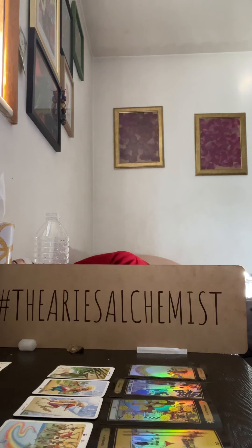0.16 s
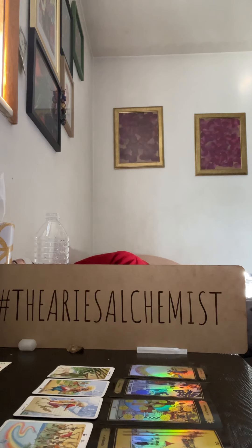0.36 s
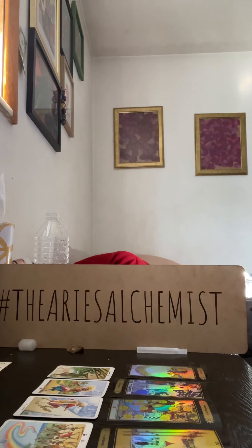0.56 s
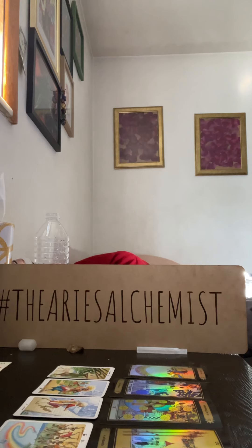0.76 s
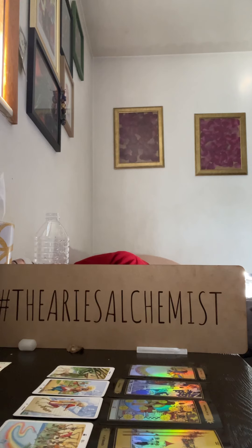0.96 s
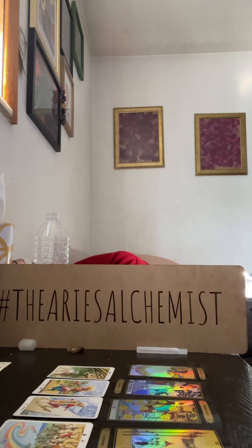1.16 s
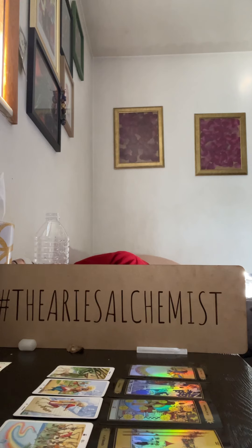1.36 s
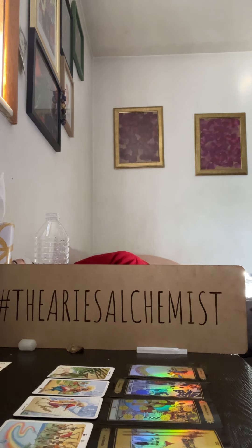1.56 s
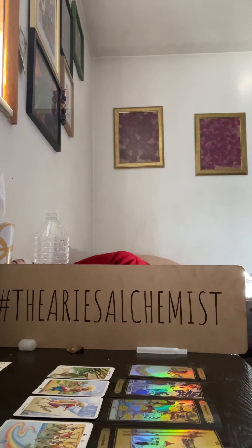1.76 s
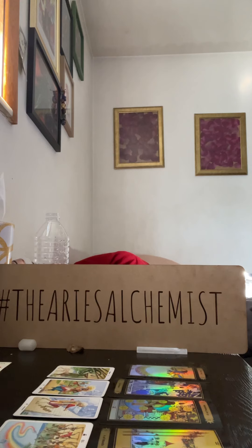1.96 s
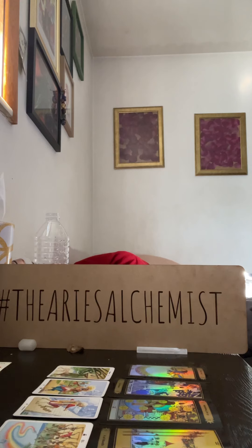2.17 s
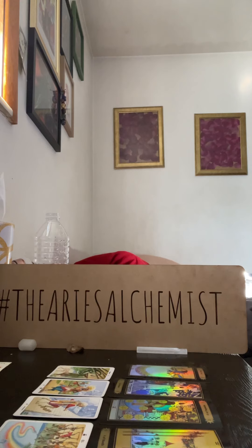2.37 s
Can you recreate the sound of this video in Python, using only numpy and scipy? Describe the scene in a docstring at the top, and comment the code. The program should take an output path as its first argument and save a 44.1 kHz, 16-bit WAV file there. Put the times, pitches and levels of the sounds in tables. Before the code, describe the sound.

Cards are shuffled at a table in a quick, uneven flurry of slaps, edge flicks and dull hand thuds. After a brief lull they slide together with a few light clicks, heard up close in a small, hushed room.

```python
"""A deck of cards shuffled by hand at a table in a small, quiet room, close to a stereo microphone.
Over the room's hush the hands grip the deck, card faces slide and the hands thud softly.
Packets then slap onto the deck in a quick flurry, stiff edges flick and ring, and the table rings along.
Last, the deck is squared with a longer slide and a few faint clicks."""
import sys
import numpy as np
from scipy import signal
from scipy.fft import rfft, irfft
from scipy.io import wavfile
from scipy.ndimage import uniform_filter1d

SR = 44100
rng = np.random.default_rng(int(sys.argv[2]) if len(sys.argv) > 2 else 0)


def dump(signal):
    """Clip the signal to [-1, 1] and save it as 16-bit WAV at the path in sys.argv[1]."""
    limited = np.clip(np.atleast_2d(signal).T, -1, 1)
    pcm = np.round(limited * 32767).astype(np.int16)
    wavfile.write(sys.argv[1], SR, pcm)


N = 105840
T = np.arange(N) / SR
FFT_SIZE = 2 ** 18
HZ = np.maximum(np.arange(FFT_SIZE // 2 + 1) * SR / FFT_SIZE, 1)
SIDES = np.array([[1], [-1]])  # left, right


def from_db(db):
    """Decibels to gain."""
    return 10 ** (np.asarray(db) / 20)


def at_hz(points, hz, column=1):
    """One column of a table, read on a log-frequency axis."""
    rows = np.array(points, float)
    return np.interp(np.log(hz), np.log(rows[:, 0]), rows[:, column])


def unit_rms(x):
    """Scale to rms 1."""
    return x / np.sqrt(np.mean(np.abs(x) ** 2) + 1e-20)


def minimum_phase(gain):
    """Causal response with the given magnitude."""
    cepstrum = irfft(np.log(gain + 1e-9))
    half = len(cepstrum) // 2
    cepstrum[1:half] *= 2
    cepstrum[half + 1:] = 0
    return np.exp(rfft(cepstrum))


def add(out, start_s, sound):
    """Mix a sound in at start_s."""
    i = max(int(start_s * SR), 0)
    out[..., i:i + sound.shape[-1]] += sound[..., :max(N - i, 0)]


def coloured(noise, colour):
    """Give white noise a spectrum at unchanged power."""
    return irfft(rfft(noise, FFT_SIZE) * unit_rms(from_db(at_hz(colour, HZ))))[..., :N]


def dulled(x, top_hz):
    """A gentle low-pass."""
    return signal.sosfilt(signal.butter(2, top_hz, fs=SR, output="sos"), x)


def rise_and_fall(t, rise_s, t60_s):
    """An envelope that builds, then loses 60 dB every t60_s."""
    return (1 - np.exp(-t / rise_s)) * np.exp(-np.log(1000) * t / t60_s)


# Spectrum of the quiet room: frequency_hz, density_db
HUSH_COLOUR = [(15, -35), (30, -8), (55, 4.5), (85, 2.5), (150, -6.5), (400, -18), (1000, -32.5),
               (2500, -37), (5000, -35), (10000, -37), (13000, -56)]

def hush():
    """Room tone: a steady, very faint, low noise."""
    return from_db(-68) * coloured(rng.standard_normal((2, N)), HUSH_COLOUR)


# Rustle of the hands, close up: time_s, level_db
GRIP_LEVELS = [(0, -60.5), (.05, -75), (.125, -84), (.16, -36), (.24, -45), (.31, -66), (.43, -58),
               (.53, -46.5), (.60, -40), (.68, -46.5), (.83, -47), (.96, -47), (1.07, -43), (1.16, -60.5),
               (1.42, -65.5), (1.59, -65), (1.63, -57), (1.71, -51), (1.80, -41), (1.95, -47.5),
               (2.06, -62), (2.3, -88), (2.4, -59)]
# Spectrum of that rustle: frequency_hz, density_db
GRIP_SPECTRUM = [(20, -24), (45, -2), (80, 0.5), (150, -2), (260, -8), (430, -3.5), (800, -8), (1300, -7.5),
                 (2500, -21.5), (8000, -43)]

def grip():
    """Fingers and palms shift on the deck: a dull rustle."""
    level_db = np.interp(T, *np.transpose(GRIP_LEVELS))
    return coloured(rng.standard_normal((2, N)), GRIP_SPECTRUM) * from_db(level_db)


# Hiss of card sliding over card: time_s, level_db
SLIDE_LEVELS = [(0, -71.5), (.125, -94), (.16, -26.5), (.26, -65), (.30, -60), (.37, -54), (.43, -40),
                (.51, -43), (.67, -50.5), (.78, -32), (.84, -51), (.95, -45.5), (1.03, -39), (1.11, -59),
                (1.25, -59.5), (1.42, -54), (1.54, -44), (1.71, -45.5), (1.80, -39), (1.90, -42),
                (1.97, -47.5), (2.03, -63.5), (2.13, -61), (2.21, -56), (2.29, -61.5), (2.4, -50)]
# Spectrum of that hiss: frequency_hz, density_db
SLIDE_SPECTRUM = [(100, -32), (450, -12.5), (800, -2), (1150, -13.5), (1600, -4.5), (2700, 4), (3300, -5),
                  (4100, -1), (5200, -11), (9500, -18), (11200, -14), (12500, -31), (16000, -26)]

def sliding(catches_per_s=700, catch_share=.55, catch_spread_db=4, slip_s=.0071, slip_db=1.5):
    """Card faces rub, catching and slipping: an uneven hiss with tiny ticks."""
    sizes = from_db(catch_spread_db * np.minimum(rng.exponential(1, N), 4))
    catches = unit_rms(rng.standard_normal((2, N)) * sizes * (rng.random(N) < catches_per_s / SR))
    rub = catch_share * catches + np.sqrt(1 - catch_share ** 2) * rng.standard_normal((2, N))
    waver_db = slip_db * unit_rms(uniform_filter1d(rng.standard_normal(N), int(slip_s * SR)))
    level_db = np.interp(T, *np.transpose(SLIDE_LEVELS))
    return coloured(rub, SLIDE_SPECTRUM) * from_db(level_db + waver_db)


# Soft thuds of the hands near the microphone: start_s, pitch_hz, level_db
HAND_THUDS = [(.03, 85, -44.5), (.165, 84, -45), (0.267, 80, -23.5), (0.403, 85.5, -54), (0.607, 69.6, -30),
              (.645, 61.6, -43), (0.736, 58, -24), (0.88, 65, -31), (1.052, 61, -22), (1.196, 79.5, -37.5),
              (1.259, 65, -40.5), (1.316, 67.7, -36), (1.767, 75, -33.5)]

def thuds():
    """The hands take the weight of a packet: a low, damped swing."""
    out, t = np.zeros((2, N)), T[:SR // 2]
    envelope = 2 * rise_and_fall(t, rise_s=.011, t60_s=.069)
    for start_s, pitch_hz, level_db in HAND_THUDS:
        add(out[0], start_s, from_db(level_db) * np.sin(2 * np.pi * pitch_hz * t) * envelope)
    return out


# Packets landing on the deck: start_s, decay_s, body_db, low_mid_db, edge_db, presence_db, treble_db
PACKET_SLAPS = [(0.141, 0.0013, -34, -33, -46, -40, -37), (0.1556, 0.0033, -22, -16, -12, -28, -13.5),
                (0.161, 0.00099, -21, -19.5, -25, -10.5, -26), (0.2061, 0.0024, -19, -30, -12, -18.5, -12),
                (0.2522, 0.0029, -20, -17.5, -19, -15.5, -15),
                (0.2606, 0.0058, -25.5, -20.5, -19.5, -20, -20), (0.339, 0.0047, -27.5, -33, -41, -42, -45),
                (0.381, 0.0018, -28.5, -39, -43, -40, -43), (0.4017, 0.0028, -18, -15, -14, -11, -10),
                (0.438, 0.003, -38, -20, -31.5, -24, -23), (0.471, 0.0028, -19.5, -18, -18.5, -10.5, -14.5),
                (0.532, 0.005, -23, -18, -24.5, -30, -27), (0.5958, 0.0014, -22.5, -20.5, -22, -13.5, -19),
                (0.631, 0.0018, -24.5, -20.5, -14.5, -24, -15), (0.6953, 0.002, -23, -56, -30, -22, -56),
                (0.696, 0.0014, -28.5, -21, -25.5, -16, -16.5),
                (0.7311, 0.0015, -12, -15.5, -6, -15.5, -8.5), (0.811, 0.0049, -25, -25.5, -27, -32, -25.5),
                (0.8548, 0.0035, -23, -29, -23, -34, -25.5), (0.876, 0.0033, -18, -22.5, -12, -17.5, -16),
                (0.886, 0.013, -12.5, -17, -20.5, -24.5, -27), (0.9356, 0.003, -25, -27.5, -31, -32, -25),
                (0.967, 0.0086, -36, -30, -28, -54, -60), (0.982, 0.0054, -23, -48, -49, -22, -34),
                (0.989, 0.0028, -22, -22.5, -25, -66, -46), (1.0001, 0.0036, -33, -19, -18.5, -33, -19.5),
                (1.017, 0.0053, -20.5, -23, -21.5, -27, -26), (1.028, 0.0046, -15.5, -22, -24, -21, -23.5),
                (1.0363, 0.0056, -17.5, -7.5, -9.5, -15.5, -11.5), (1.041, 0.0026, -10, -14, -17, -16, -15),
                (1.051, 0.007, -23.5, -12.5, -20, -23, -31), (1.17, 0.012, -39, -26.5, -33.5, -51.5, -53),
                (1.304, 0.0068, -37.5, -36.5, -41, -46, -37), (1.369, 0.0022, -71, -50, -50, -30, -32),
                (1.379, 0.0026, -61, -40, -39.5, -52, -34), (1.42, 0.0047, -46, -57, -44, -74, -65),
                (1.475, 0.003, -67, -31, -32.5, -41, -34), (1.6104, 0.0068, -31.5, -39, -24, -41, -34.5),
                (1.65, 0.012, -33.5, -27.5, -22.5, -53, -36), (1.7483, 0.0013, -50, -28, -20.5, -32.5, -25),
                (1.7612, 0.0012, -37.5, -22.5, -19, -17.5, -19), (1.7648, 0.0036, -27, -20, -29, -27, -20),
                (1.836, 0.0016, -37, -27.5, -22.5, -32, -50), (1.94, 0.006, -33.5, -24.5, -27, -39, -23),
                (2.0317, 0.0036, -67, -44, -35, -56.5, -49), (2.16, 0.0025, -71, -57, -47, -60, -60)]
# Centres of those five bands, body to treble: frequency_hz
BAND_CENTRES_HZ = [220, 720, 2200, 4300, 8500]
# Spectrum of card striking card: frequency_hz, density_db
DECK_COLOUR = [(40, -14), (70, -12), (160, -4.5), (300, -14.5), (430, -8), (620, -8.5), (820, -5),
               (1150, -16.5), (1600, -8.5), (2300, -4), (2900, -2.5), (3300, -7.5), (4100, -2.5),
               (5200, -13.5), (7500, -21), (10000, -23), (13000, -26), (16000, -38.5)]

def slaps(contacts_per_s=3500, attack_s=.0006, first_contact=.19, brush_s=.004, brush_db=-16.5):
    """Each packet brushes in, lands with one sharp contact, and the cards behind it flutter to rest."""
    size, lead = 4096, 512  # samples in a slap, and of those, before it lands
    out, t = np.zeros((2, N)), T[:size] - lead / SR
    since_landing = np.maximum(t, 0)
    hz = np.maximum(np.arange(size // 2 + 1) * SR / size, 1)
    deck = unit_rms(from_db(at_hz(DECK_COLOUR, hz))) * from_db(-2.42) * np.sqrt(SR / 100)
    for start_s, decay_s, *band_db in PACKET_SLAPS:
        contacts = rng.standard_normal((2, size))
        contacts *= np.where(rng.random((2, size)) < contacts_per_s / SR, 1, .25)
        brush = dulled(contacts, top_hz=3070) * from_db(brush_db) * np.exp(-np.abs(t) / brush_s)
        flutter = contacts * (1 - np.exp(-since_landing / attack_s)) * np.exp(-since_landing / decay_s)
        slap = brush + flutter
        slap /= np.sqrt(np.sum(slap ** 2, axis=1, keepdims=True))
        slap[0, lead + int(attack_s * SR)] += first_contact
        # Gentle slaps, with treble_db under -31, lack the very top.
        top_db = np.interp(hz, [11000, 13000], [0, .24 * min(band_db[-1] + 31, 0)])
        tone_db = np.interp(np.log(hz), np.log(BAND_CENTRES_HZ), band_db)
        response = minimum_phase(deck * from_db(tone_db + top_db))
        add(out, start_s - lead / SR, irfft(rfft(slap) * response))
    return out


# Stiff card edges flicking free: start_s, pitch_hz, level_db, t60_s
EDGE_FLICKS = [(.2048, 2190, 2, 0.025), (.4012, 2210, -0.5, 0.03), (.4712, 2130, -7, 0.037),
               (.6312, 2480, -20, 0.038), (.7322, 2457, -7, 0.043), (0.7394, 2770, -4, 0.028),
               (1.7614, 2698, -11, 0.039)]

def flicks(overtone_ratio=1.85, overtone_db=-24.5, rise_s=.0019):
    """A released card edge rings briefly at one pitch, with a weak overtone."""
    out, t = np.zeros((2, N)), T[:SR // 5]
    for start_s, pitch_hz, level_db, t60_s in EDGE_FLICKS:
        phase = 2 * np.pi * pitch_hz * t
        ring = np.sin(phase) + from_db(overtone_db) * np.sin(overtone_ratio * phase)
        add(out[0], start_s, from_db(level_db) * ring * rise_and_fall(t, rise_s, t60_s))
    return out


# Resonances of the table and what stands near it: pitch_hz, over_direct_db, t60_s
TABLE_RESONANCES = [(424.9, -7, 0.11), (833, -5, 0.096), (899, -7, 0.061), (1180, 0, .1),
                    (1414, -3.5, 0.041), (1557, 3.5, 0.048), (1730, -32, 0.22), (2410, -11, 0.17),
                    (2540, -9, 0.083), (2985, -5.5, 0.036)]

def table(cards):
    """The table rings along with the cards at its resonances."""
    out = cards.copy()
    for pitch_hz, over_direct_db, t60_s in TABLE_RESONANCES:
        radius = from_db(-60 / (t60_s * SR))
        poles = [1, -2 * radius * np.cos(2 * np.pi * pitch_hz / SR), radius ** 2]
        out += from_db(over_direct_db) * (1 - radius ** 2) / 2 * signal.lfilter([1, 0, -1], poles, cards)
    return out


# The microphone's two ports: frequency_hz, likeness (0-1), right_minus_left_db
MIC_PORTS = [(100, 1, 1), (450, 0.92, 3.5), (1042, 0.63, 1), (2360, 0.1, 2), (3730, 1, 0),
             (5130, 0.68, -0.5), (6700, 1, 1), (13000, 0.93, -0.5)]
# How far the right port leads the left: frequency_hz, lead_rad
MIC_PHASE = [(100, 0), (500, .15), (1000, .9), (2400, .6), (3400, 2), (5400, 2), (7000, .5), (10000, 1.5),
             (13000, 2.8), (16000, 3.4)]

def microphone(pair):
    """Row 0 reaches both ports alike, row 1 with opposite signs; together they make left and right."""
    mid, side = rfft(pair, FFT_SIZE)
    likeness = np.clip(at_hz(MIC_PORTS, HZ), 0, .995)
    ports = np.sqrt((1 + likeness) / 2) * mid + SIDES * np.sqrt((1 - likeness) / 2) * side
    phase_shift = np.exp(-.5j * SIDES * at_hz(MIC_PHASE, HZ))
    balance = from_db(-.5 * SIDES * at_hz(MIC_PORTS, HZ, column=2))
    return irfft(ports * phase_shift * balance)[:, :N]


# Echoes off the table and near walls: left_delay_s, right_delay_s, level_db
NEAR_ECHOES = [(.0031, 0.0028, -11), (.0086, 0.0096, -15.5), (.0162, 0.013, -18)]
# The small room's tail: frequency_hz, level_db, t60_s
ROOM_TAIL = [(81.4, -4, 0.32), (300, -8, 0.14), (900, -14, 0.29), (2500, -12, 0.29), (4950, -10.5, 0.19),
             (10000, -12.5, 0.19), (14000, -24, .15)]

def room(direct, build_s=.002):
    """The room adds a few near echoes and a diffuse tail that dies band by band."""
    t = T[:SR // 2]
    tail, echoes = np.zeros((2, 2, len(t)))
    edges_hz = np.geomspace(40, 17000, 13)
    for low, high in zip(edges_hz, edges_hz[1:]):
        hz = np.sqrt(low * high)
        envelope = rise_and_fall(t, build_s, at_hz(ROOM_TAIL, hz, column=2))
        band = signal.butter(2, [low, high], "band", fs=SR, output="sos")
        mid, side = signal.sosfilt(band, rng.standard_normal((2, len(t))) * envelope)
        likeness = 1 / (1 + (hz / 1200) ** 2)  # the tail widens toward the treble
        pair = np.sqrt((1 + likeness) / 2) * mid + SIDES * np.sqrt((1 - likeness) / 2) * side
        tail += from_db(at_hz(ROOM_TAIL, hz)) * pair / np.sqrt(np.sum(envelope ** 2))
    for left_s, right_s, level_db in NEAR_ECHOES:
        echoes[[0, 1], [int(left_s * SR), int(right_s * SR)]] += from_db(level_db)
    return direct + signal.fftconvolve(direct, tail + dulled(echoes, top_hz=6000), axes=1)[:, :N]


def scene():
    """Cards and hands close to the microphone in the small room; thuds and hush carry no echo."""
    room_tone = hush()
    shuffle = table(slaps() + sliding()) + flicks() + grip()
    return room(microphone(shuffle)) + microphone(thuds() + room_tone)


def record(dry, low_cut_hz=41, stopband_hz=17400):
    """The recorder rounds the highest peaks and cuts the deepest bass and the very top."""
    rounded = dry / (1 + np.abs(dry) ** 6) ** (1 / 6)
    lean = signal.sosfilt(signal.butter(2, low_cut_hz, "high", fs=SR, output="sos"), rounded)
    return signal.sosfilt(signal.cheby2(14, 80, stopband_hz, fs=SR, output="sos"), lean)


dry = scene()
out = record(dry)
dump(out)
```